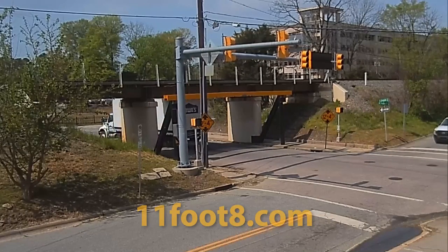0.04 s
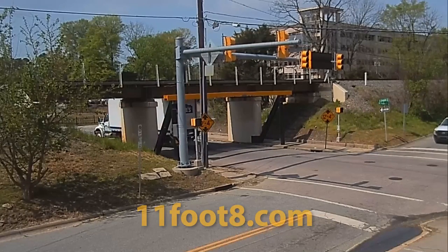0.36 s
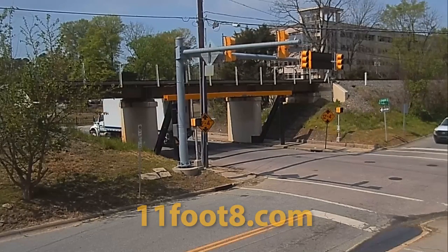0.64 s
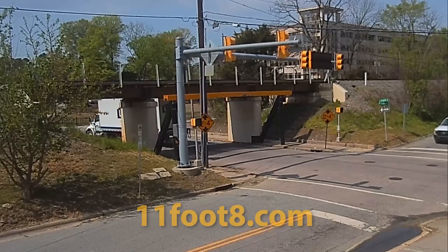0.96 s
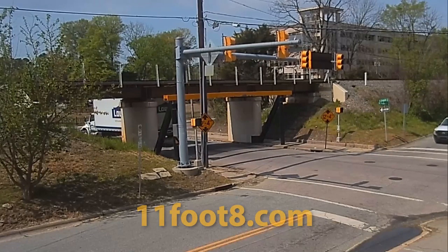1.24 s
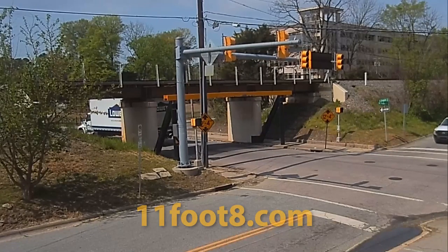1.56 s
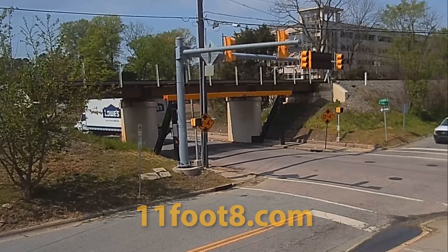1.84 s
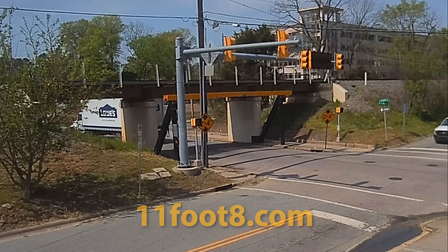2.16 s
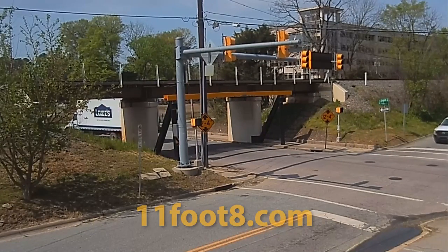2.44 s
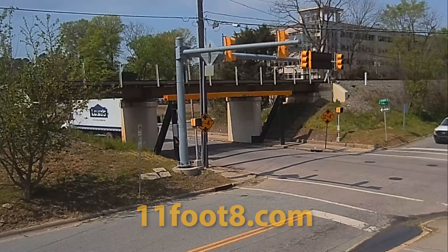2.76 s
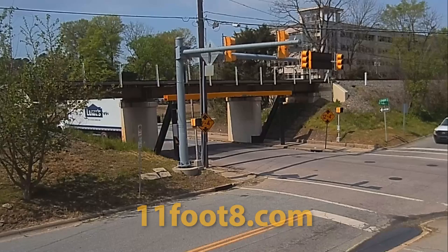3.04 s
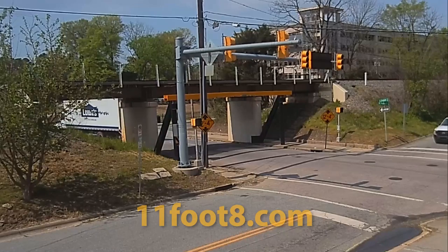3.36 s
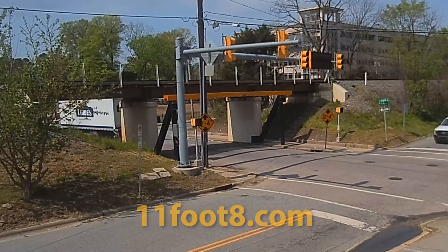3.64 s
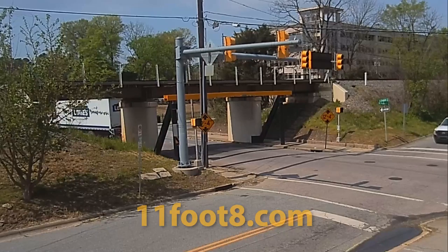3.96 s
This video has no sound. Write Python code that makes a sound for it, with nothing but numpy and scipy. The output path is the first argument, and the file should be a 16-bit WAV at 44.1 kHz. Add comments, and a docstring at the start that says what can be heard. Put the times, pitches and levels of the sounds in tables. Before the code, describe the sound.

A box truck's roof scrapes along a steel bridge beam from the start, with hollow booms that slightly overload the microphone. Rattling screeches and high squeals echo in the underpass until about 1.4 seconds. The scraping dies away by roughly 2.3 seconds as the diesel engine fades. Distant traffic and a low rumble remain, with faint bird chirps from 2.6 seconds and a soft, far knock near 3.6.

```python
"""Under a low bridge, a box truck drags its roof along a steel beam, comes free and drives away.
The hollow box booms, the roof sheet scrapes, snags and squeals, and the underpass rings on.
The diesel fades, leaving distant traffic and a few birds.
All is heard through a narrow-band outdoor camera that overloads at first."""
import sys
import numpy as np
from scipy import signal
from scipy.fft import rfft, irfft
from scipy.io import wavfile
from scipy.ndimage import uniform_filter1d

SR = 44100
rng = np.random.default_rng(int(sys.argv[2]) if len(sys.argv) > 2 else 0)


def pcm_store(signal):
    """Save signal as 16-bit PCM."""
    levels = np.round(np.clip(np.atleast_2d(signal), -1, 1) * 32767)
    wavfile.write(sys.argv[1], SR, levels.astype(np.int16).T)


N = 176400
T = np.arange(N) / SR
FREQS_HZ = np.maximum(np.arange(N // 2 + 1) * SR / N, 1)


def undb(db):
    """Decibels to gain."""
    return 10 ** (np.asarray(db) / 20)


def unit(x):
    """Scale to rms 1."""
    return x / np.sqrt(np.mean(x ** 2))


def noise():
    """White noise."""
    return rng.standard_normal(N)


def walk(rate_hz):
    """Smooth random motion; rms 1."""
    span = max(int(SR / rate_hz), 1)
    return unit(uniform_filter1d(uniform_filter1d(noise(), span), span))


def curve(rows):
    """Gain over time from (s, dB) points."""
    return undb(np.interp(T, *np.array(rows).T))


def colour(x, points):
    """Filter by (Hz, dB) points; rms 1."""
    hz, db = np.array(points).T
    gain = undb(np.interp(np.log(FREQS_HZ), np.log(hz), db))
    return unit(irfft(rfft(x) * gain, N))


def ring(x, modes, order=1):
    """Filter by (Hz, width Hz, dB) resonances of alternating sign; rms 1."""
    response = 0
    for k, (hz, width_hz, db) in enumerate(modes):
        detuning = (FREQS_HZ ** 2 - hz ** 2) / (FREQS_HZ * width_hz)
        response += (-1) ** k * undb(db) / (1 + 1j * detuning) ** order
    return unit(irfft(rfft(x) * response, N))


def burst(start_s, length_s, attack_s, release_s):
    """Linear attack, hold, exponential release."""
    rise = np.clip((T - start_s) / attack_s, 0, 1)
    return rise * np.exp(-np.maximum(T - start_s - length_s, 0) / release_s)


def slips(per_s, spread_db):
    """Dense stick-slip clicks of uneven size."""
    clicks = (rng.random(N) < per_s / SR) * np.sign(noise())
    return clicks * undb(spread_db * np.minimum(rng.exponential(size=N), 4))


def glides(rows, tremble, attack_s, release_s):
    """Gliding tones; tremble is the rms pitch wobble as a fraction."""
    tones = 0
    for start_s, length_s, from_hz, to_hz, db in rows:
        hz = np.interp(T, [start_s, start_s + length_s], [from_hz, to_hz]) * (1 + tremble * walk(500))
        tone = np.sqrt(2) * np.sin(2 * np.pi * np.cumsum(hz) / SR)
        tones += undb(db) * burst(start_s, length_s, attack_s, release_s) * tone
    return tones


def echo(x, t60_s, wet_db):
    """Add diffuse reflections after a 12 ms gap."""
    tail = noise() * undb(-60 * T / t60_s) * (T > .012)
    wet = signal.fftconvolve(x, tail / np.sqrt(np.sum(tail ** 2)))[:N]
    return x + undb(wet_db) * wet


def cargo_box():
    """The dragging roof shakes the hollow box, which booms at each jolt and drones as it comes free."""
    # Wall response. Each row: frequency in Hz, relative level in dB.
    wall_spectrum = [(12, -32), (20, -6.5), (86, 4.5), (125, -5.5), (160, 0), (198, -8.5), (232, -6),
                     (546, -19.5), (882, -21.5), (1400, -32), (1820, -50), (3080, -120)]
    # Wall modes. Each row: frequency in Hz, width in Hz, relative level in dB.
    wall_modes = [(62, 19, -2), (98.3, 14.8, 3.5), (164.6, 29.4, -2), (233, 19.8, -2.5), (284.4, 48, -8.5),
                  (419.6, 36, -8.5), (534, 60, -14)]
    # Shaking of the box. Each row: time in seconds, gain in dB.
    shake = [(0, -17.5), (.04, -11), (.12, -12), (.2, -17), (.36, -23), (.52, -27), (.76, -32),
             (.86, -25.5), (.95, -28.5), (1.1, -22.5), (1.25, -27), (1.39, -34), (1.57, -37), (1.8, -42),
             (2.3, -52), (4, -82)]
    # Jolts. Each row: start in seconds, pitch in Hz, level in dB.
    jolts = [(0.264, 92, -18.5), (.825, 77.5, -21.5)]
    # Drone. Each row: start and length in seconds, start and end pitch in Hz, level in dB.
    drones = [(1.5, 0.23, 200, 174, -40.5)]
    walls = colour(slips(per_s=900, spread_db=1.66), wall_spectrum + [(2500, -50.5), (5000, -73)])
    ringing = ring(slips(per_s=500, spread_db=3.3), wall_modes)
    boom = (undb(-2) * walls + undb(-3) * ringing) * curve(shake)
    for start_s, hz, db in jolts:
        envelope = burst(start_s, length_s=.033, attack_s=.0029, release_s=.022)
        boom += undb(db) * envelope * np.sin(2 * np.pi * hz * (T - start_s))
    return boom + glides(drones, tremble=.062, attack_s=.03, release_s=.034)


def roof_scrape():
    """The roof sheet judders along the beam in stick-slip and rings."""
    # Sheet response. Each row: frequency in Hz, relative level in dB.
    sheet_spectrum = [(300, -24), (700, -9.5), (1200, 0.5), (1900, -2), (2450, -1), (3000, 1.5), (4000, -2),
                      (5000, 3.5), (5500, 1)]
    # Sheet modes. Each row: frequency in Hz, width in Hz, relative level in dB.
    sheet_modes = [(1517, 82, 0), (1773, 117, 0.5), (2058, 105, -1.5), (2815, 130, -4.5), (3210, 220, -0.5),
                   (4654, 240, 4.5)]
    # Rubbing on the beam. Each row: time in seconds, gain in dB.
    rub = [(0, -24), (.12, -22), (.2, -21), (.33, -26), (.52, -29.5), (.68, -28.5), (.78, -32.5),
           (.85, -30), (.96, -37.5), (1.1, -31), (1.25, -38.5), (1.4, -44), (1.53, -45), (1.6, -44.5),
           (1.85, -50.5), (2.02, -48), (2.3, -59.5), (4, -78)]
    judder = slips(per_s=2500, spread_db=4) * undb(-.7 * walk(60))
    rasp = colour(judder, sheet_spectrum)
    ringing = ring(slips(per_s=2500, spread_db=4), sheet_modes)
    return (undb(5) * rasp + undb(-5) * ringing) * curve(rub)


def roof_snags():
    """The roof catches on the beam; each snag is a rattling screech around its own centre."""
    # Snags. Each row: start and length in seconds, centre in Hz, level in dB.
    snags = [(0.057, 0.023, 4350, -24), (0.299, 0.014, 4800, -26), (0.378, 0.026, 3950, -22.5),
             (0.536, .014, 4480, -23), (0.567, 0.017, 3950, -27), (0.6, 0.018, 4240, -25),
             (0.82, 0.0096, 3970, -33), (1.065, 0.0069, 4450, -26.5), (1.087, 0.0072, 4080, -33)]
    width_hz = 2000
    screeches = 0
    for start_s, length_s, hz, db in snags:
        band = ring(noise(), [(hz, width_hz, 0)], order=2)
        screeches += undb(db) * burst(start_s, length_s, attack_s=.0035, release_s=.011) * band
    return screeches * undb(2 * walk(200))


def roof_squeals():
    """The dragged sheet squeals in high, fluttering tones."""
    # Squeals. Each row: start and length in seconds, start and end pitch in Hz, level in dB.
    squeals = [(.618, 0.039, 3790, 3378, -32), (.655, 0.037, 3480, 3430, -39),
               (.692, .03, 3120, 3130, -33.5), (1.03, 0.27, 3430, 3450, -46),
               (1.13, 0.236, 3680, 3728, -46), (1.198, .014, 3770, 3760, -43.5)]
    return glides(squeals, tremble=.0129, attack_s=.0056, release_s=.01) * undb(3.6 * walk(110))


def engine():
    """Uneven diesel firings through the exhaust, fading with distance."""
    # Exhaust response. Each row: frequency in Hz, relative level in dB.
    exhaust = [(30, -12), (80, -4.5), (170, 1), (300, -8.5), (700, -25.5), (2000, -31.5)]
    firing_hz, start_db, fade_db_per_s = 83.93, -39.5, 4
    firings = np.cumsum(firing_hz * (1 + .025 * walk(20))) / SR
    pulses = np.diff(np.floor(firings), prepend=0) * undb(4.2 * walk(170))
    return colour(pulses - pulses.mean(), exhaust) * undb(start_db - fade_db_per_s * T)


def street():
    """Distant traffic, the tyres of a nearing car, a deep rumble and one far, dull knock."""
    # Traffic noise. Each row: frequency in Hz, relative level in dB.
    traffic_spectrum = [(12, -30), (20, 0), (59, 0), (96, -7.5), (365, -15), (495, -19), (611, -21.5),
                        (720, -27), (889, -24.5), (1000, -25.5), (1070, -24.5), (1490, -31), (2670, -38.5),
                        (4800, -35.5), (5400, -35), (7020, -72), (11900, -120)]
    # Tyre noise. Each row: frequency in Hz, relative level in dB.
    tyre_spectrum = [(150, -7), (280, 5), (450, -8), (780, 2), (1250, -5.5), (1900, -21.5), (4000, -30.5)]
    # Rumble swells. Each row: start and length in seconds, start and end pitch in Hz, level in dB.
    rumbles = [(2.38, 0.047, 43.2, 41, -31), (2.5, .75, 38.08, 37.6, -39)]
    car_end_db, car_rise_db_per_s = -45.5, 6
    traffic = colour(noise(), traffic_spectrum) * undb(-37.5 + .5 * walk(9))
    car = colour(noise(), tyre_spectrum) * undb(car_end_db - car_rise_db_per_s * (T[-1] - T))
    knock = undb(-43.5) * ring(noise(), [(950, 950, 0)], order=2)
    knock *= burst(start_s=3.603, length_s=.01, attack_s=.0058, release_s=.017)
    rumble = glides(rumbles, tremble=.25, attack_s=.022, release_s=.028)
    return traffic + car + rumble + knock


def birds():
    """Short, mostly falling whistles, blurred by the trees."""
    # Notes. Each row: start and length in seconds, start and end pitch in Hz, level in dB.
    chirps = [(2.626, 0.024, 2760, 2570, -55.5), (3.104, .036, 2730, 2550, -54.5),
              (3.526, 0.029, 2700, 2540, -56), (3.574, .016, 2380, 2320, -57),
              (3.688, .03, 4200, 4520, -60), (3.708, 0.021, 3960, 3880, -53.5)]
    whistles = glides(chirps, tremble=.009, attack_s=.012, release_s=.005)
    return echo(whistles, t60_s=.45, wet_db=-6)


def scene():
    """Truck, street and birds in mono; the roof noise echoes in the underpass."""
    box = cargo_box()
    roof = echo(roof_scrape() + roof_snags() + roof_squeals(), t60_s=1, wet_db=-6)
    return (box + roof + engine() + street() + birds())[None]


def record(dry):
    """The camera soft-clips, keeps a narrow band at quarter rate and joins its samples linearly."""
    ceiling, treble_lift = .24, .14
    band_hz, top_hz, decimation = 5430, 15800, 4
    clipped = dry[0] / (1 + (dry[0] / ceiling) ** 6) ** (1 / 6)
    narrow = signal.sosfiltfilt(signal.butter(10, band_hz, fs=SR, output="sos"), clipped)[::decimation]
    bright = np.convolve(narrow, [-treble_lift, 1 + 2 * treble_lift, -treble_lift], "same")
    joined = np.interp(T, T[::decimation], bright)
    return signal.sosfilt(signal.ellip(10, .2, 80, top_hz, fs=SR, output="sos"), joined)[None]


dry = scene()
out = record(dry)
pcm_store(out)
```